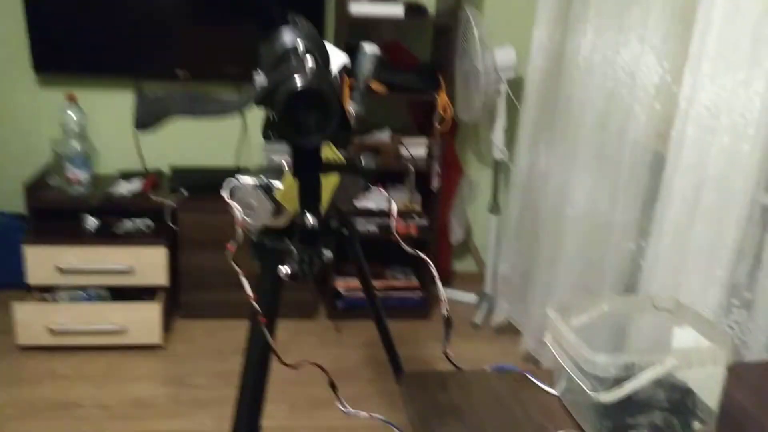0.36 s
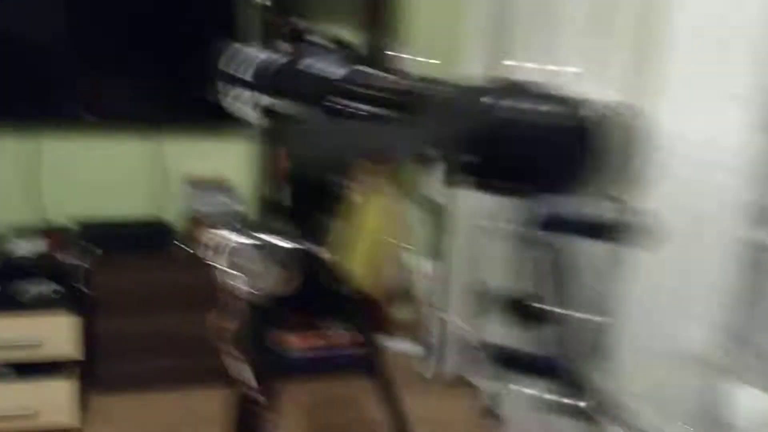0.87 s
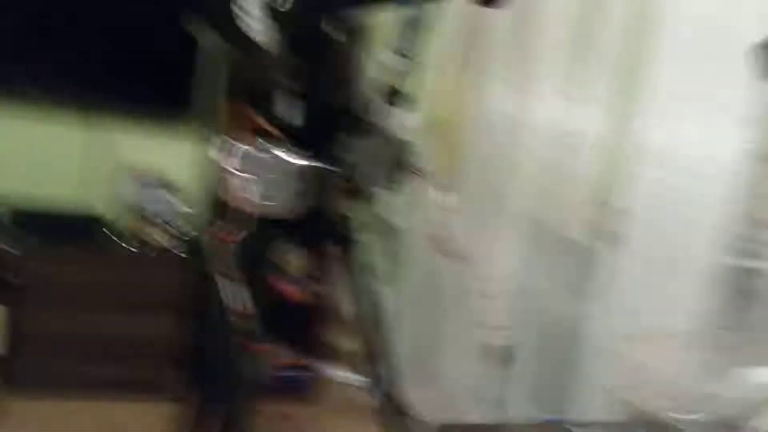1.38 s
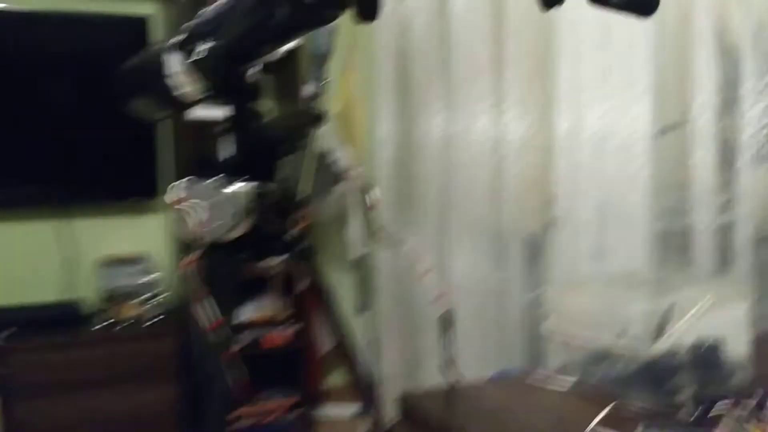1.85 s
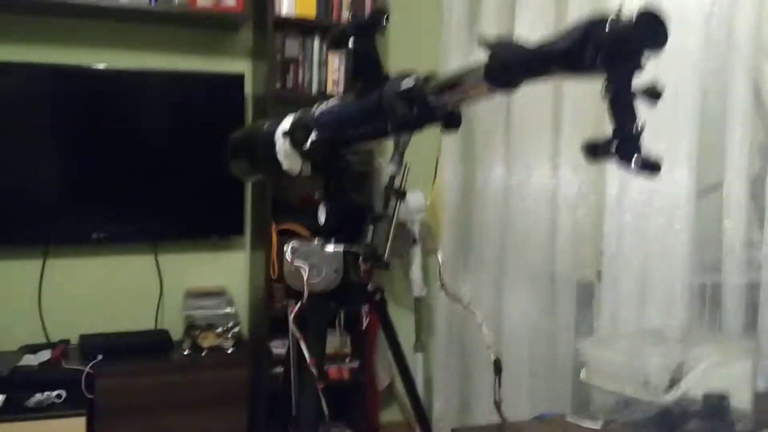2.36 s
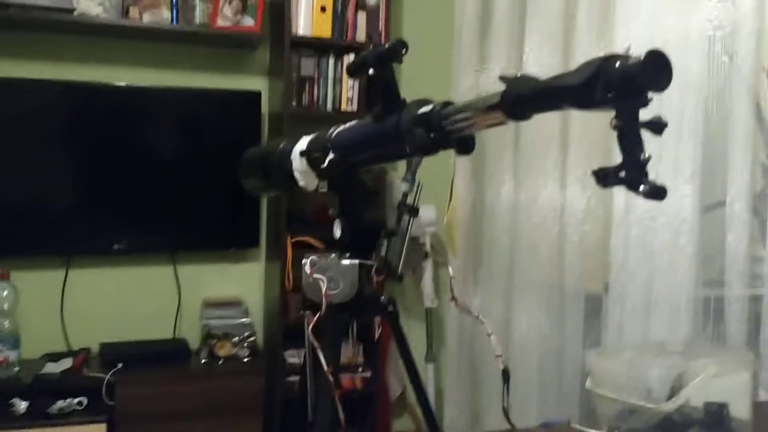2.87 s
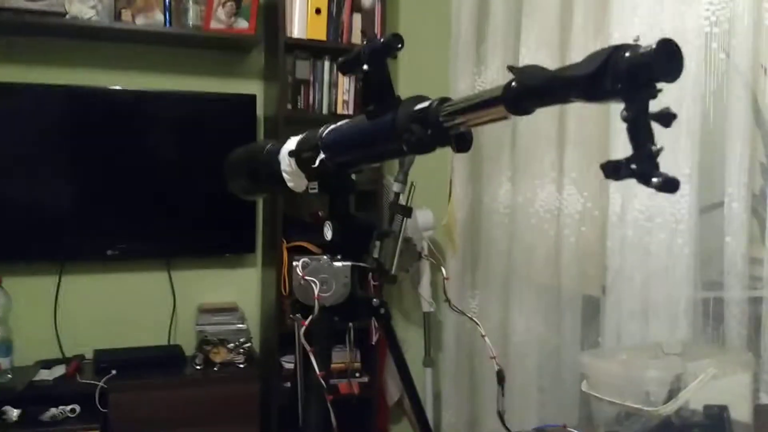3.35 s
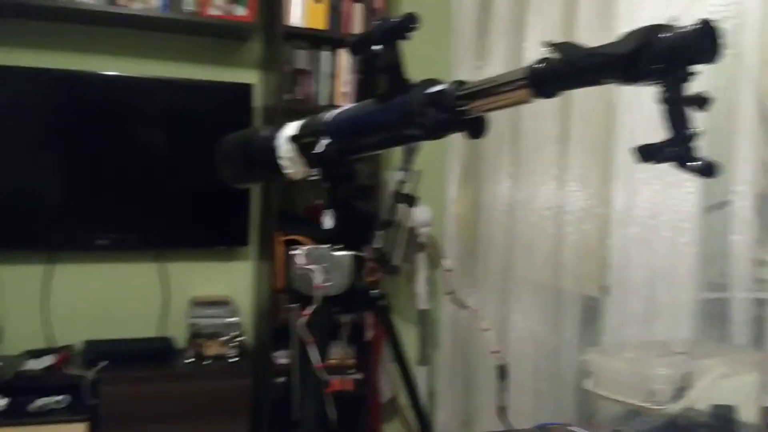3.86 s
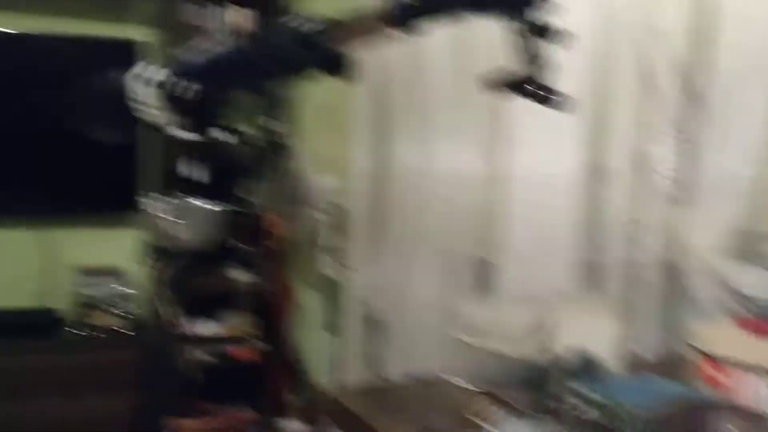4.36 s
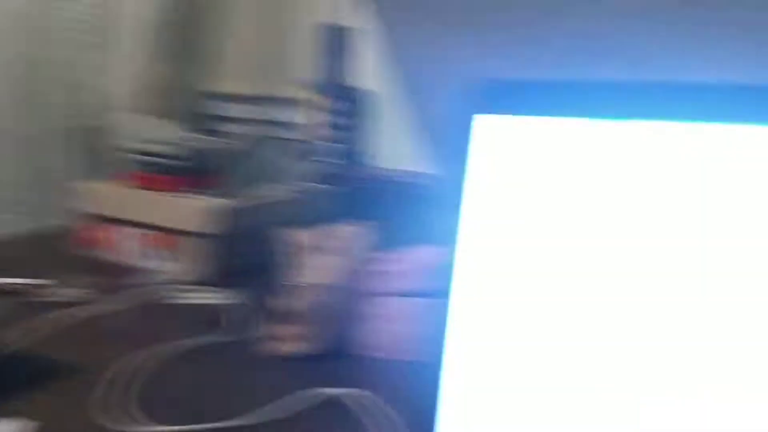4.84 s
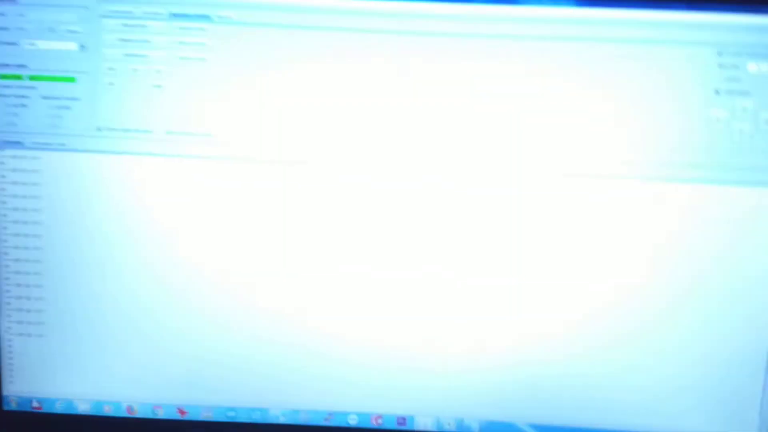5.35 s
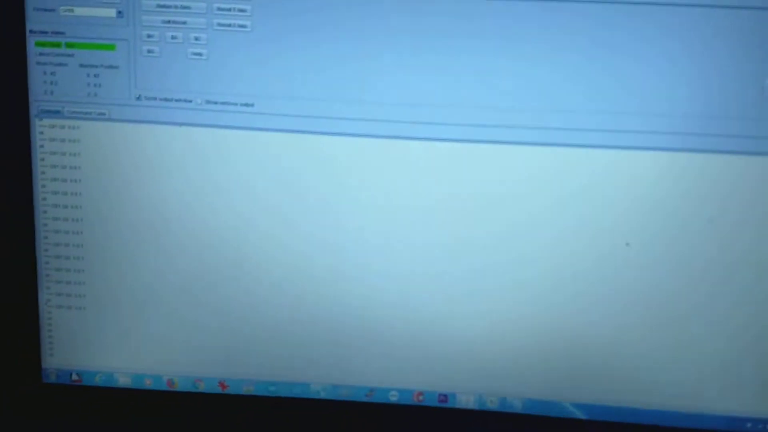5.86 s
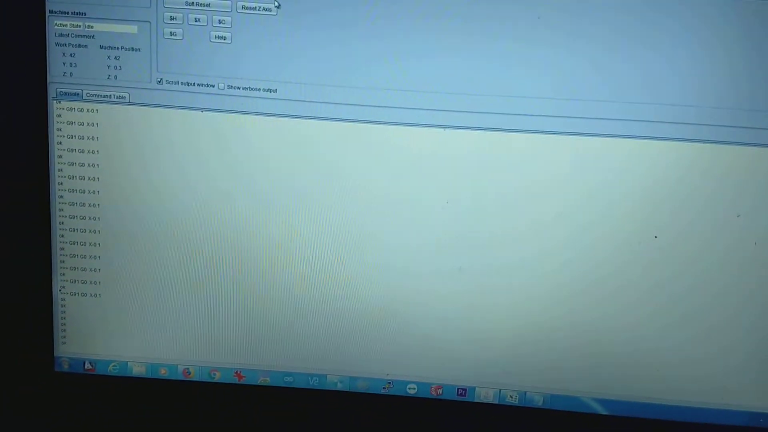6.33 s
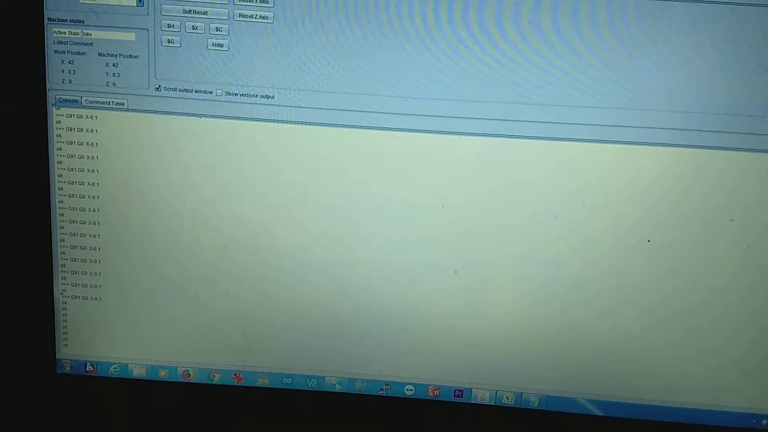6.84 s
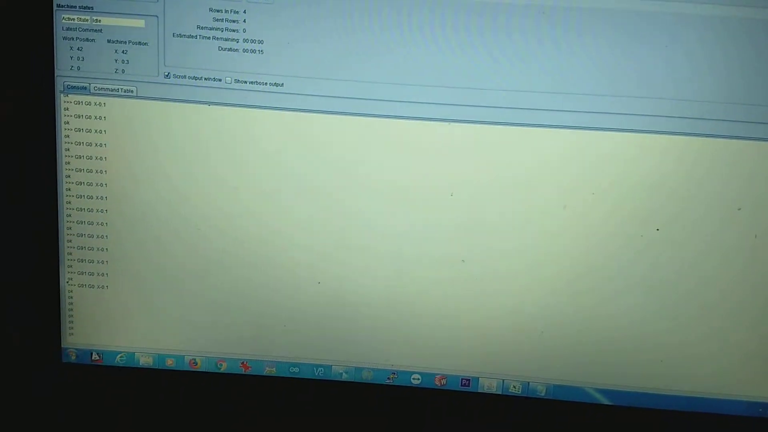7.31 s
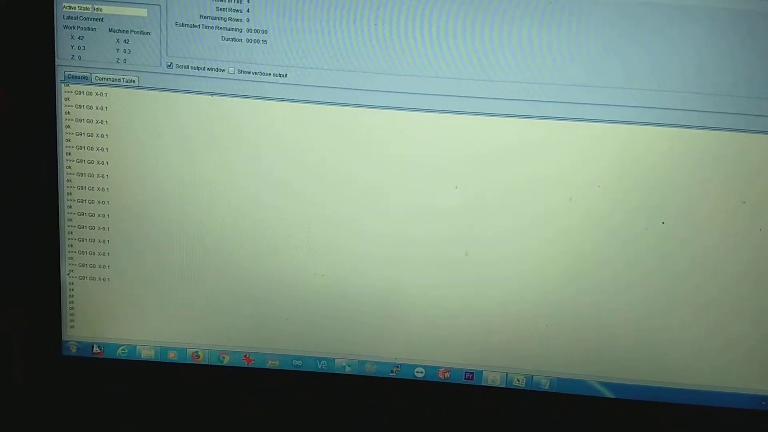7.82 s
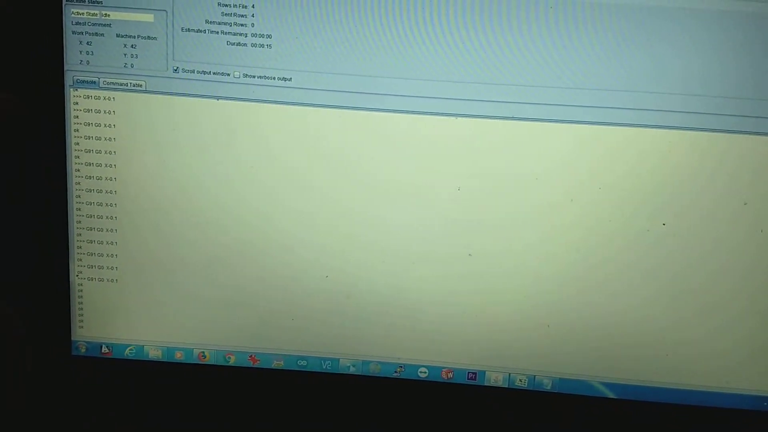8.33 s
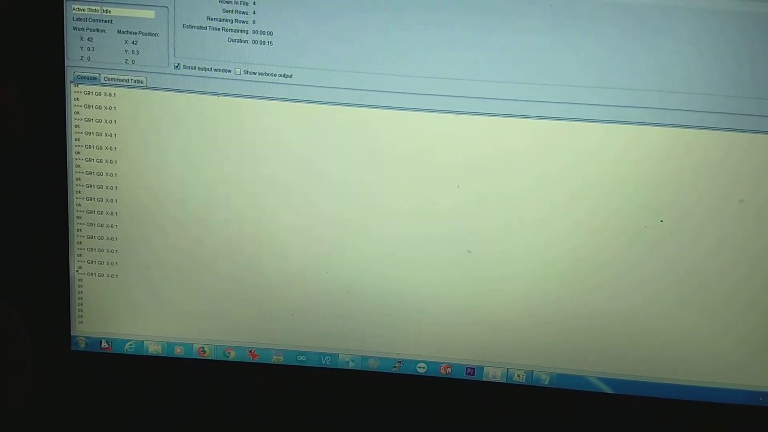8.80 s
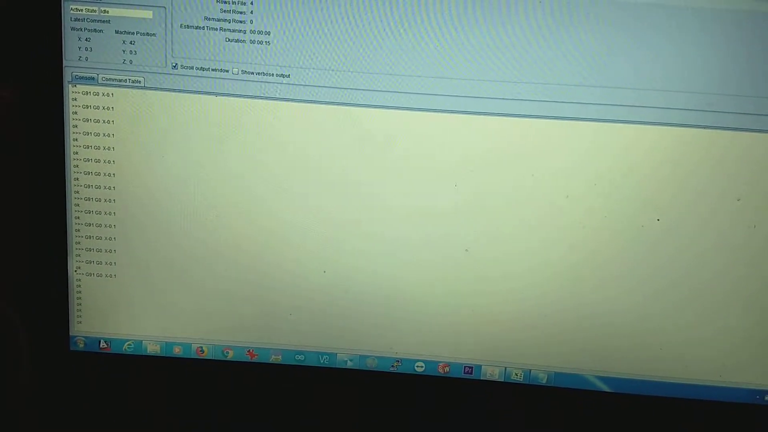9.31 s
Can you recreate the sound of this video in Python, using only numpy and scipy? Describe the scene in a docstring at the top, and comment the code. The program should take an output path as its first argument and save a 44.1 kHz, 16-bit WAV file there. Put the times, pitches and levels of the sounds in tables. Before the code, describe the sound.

In a small room a thin motor whine runs down after fumbling and creaks; loud desk thumps follow, then quiet with a few crisp clicks.

```python
"""In a small furnished room keys are tapped and a desk is knocked; a little motor whines, then runs down.
Struck bodies are excited modes with echoes, the motor a harmonic series shaped by its housing; cloth,
stirred air, fan, case rumble and a steady background are filtered noise, furniture squeaks gliding sines.
A hand-held phone listens with two microphones; fingers rub and creak on its case near the second.
It makes stereo by taking a delayed copy of each microphone away from the other."""
import sys
import numpy as np
from scipy import signal
from scipy.fft import rfft, irfft
from scipy.io import wavfile

SR = 44100
rng = np.random.default_rng(int(sys.argv[2]) if len(sys.argv) > 2 else 0)


def store_pcm(level_fs):
    """Save levels as 16-bit WAV."""
    pcm = np.round(np.clip(level_fs, -1, 1) * 32767).astype(np.int16)
    wavfile.write(sys.argv[1], SR, np.atleast_2d(pcm).T)


def voltage_ratio(level):
    """Linear amplitude factor for a level in decibels (scalar or array-like)."""
    return 10 ** (np.asarray(level, float) / 20)


N = 427329
TIME = np.arange(N) / SR
HZ = np.maximum(np.fft.rfftfreq(N, 1 / SR), 1)

# In spectra of noise, level/dB is a relative density; the noise is then scaled to rms 1.
# reverberation of the room: [f/Hz, decay time t60/s]
ROOM_DECAY = [(200, 0.47), (1000, 0.32), (4000, 0.35), (10000, 0.28)]
# steady background, low rumble and microphone hiss: [f/Hz, level/dB]
BACKGROUND_SPECTRUM = [(30, -18), (60, 20), (120, 15.5), (300, -2), (1000, -1), (6000, -2.5), (9000, -6),
                       (16000, 0)]
# amplitude response of the first microphone: [f/Hz, level/dB]
FIRST_MIC_RESPONSE = [(100, -3), (7200, -1.64), (7900, 4), (16000, -8)]
# amplitude response of the delayed copy that is subtracted: [f/Hz, level/dB]
COPY_RESPONSE = [(40, 0.5), (300, -2.85), (2000, -3.5), (4700, -4), (7000, -6.5), (9000, -8),
                 (16000, -13.5)]

# cloth rustle, a gauge of how much the person moves: [t/s, level/dB]
RUSTLE = [(0, -66.5), (.55, -71.5), (.85, -63.5), (1.43, -51.5), (1.54, -55), (1.59, -66), (1.74, -62),
          (1.83, -54.5), (2.43, -54), (3.07, -55), (3.56, -56.5), (3.94, -63), (4.2, -60), (4.78, -62.5),
          (4.99, -51), (5.12, -55), (5.5, -50), (5.62, -59), (6.11, -57), (6.15, -64), (6.4, -64.5),
          (6.85, -72.5), (7.3, -64.5), (8.04, -69.5), (8.75, -71.5), (9.3, -76.5), (9.69, -60)]
# noise of rustling cloth: [f/Hz, level/dB]
CLOTH_SPECTRUM = [(1500, -11), (2300, 4.5), (3500, 7), (5500, 3.5), (7300, -0.5), (7800, -5), (11000, -9.5),
                  (16000, -25)]
# noise of the stirred air: [f/Hz, level/dB]
STIR_SPECTRUM = [(150, 4), (300, -0.5), (700, -3.5), (950, -3.5), (1500, -4), (2200, -8.5), (3000, -11),
                 (8000, -68)]
# weight landing on floor or furniture: [start t/s, loudest t/s, end t/s, boom level/dB, stir level/dB]
SHOVES = [(1.774, 1.834, 1.94, -49, -48.5), (1.89, 1.947, 2.6, -46, -50.5), (2.163, 2.164, 2.3, -57, -51.5),
          (4.89, 5.02, 5.08, -42.5, -39), (4.95, 5.11, 5.25, -38, -54.5), (5.277, 5.327, 5.42, -71, -43),
          (5.433, 5.47, 5.54, -60, -37.5), (5.543, 5.616, 5.86, -63, -55.5)]
# boom of the floor: [f/Hz, level/dB]
BOOM_SPECTRUM = [(25, -28), (55, 18.5), (125, 7), (240, -5.5), (500, -26), (3000, -70)]
# a sleeve brushing past; silent if it ends before its start: [start t/s, loudest t/s, end t/s, level/dB]
BRUSHES = [(.72, .88, 0.94, -58.5), (5.76, 5.92, 6.14, -55.5), (6.184, 6.216, 6, -61),
           (7.955, 8.03, 7.95, -56), (8.123, 8.197, 8.24, -59), (8.386, 8.436, 8.4, -69)]
# noise of the brushed fabric: [f/Hz, level/dB]
SLEEVE_SPECTRUM = [(1500, -7), (2600, -1), (3400, 5.5), (4200, -9), (6000, -34), (9000, -25)]
# the hand shifting its hold: [t/s, level/dB]
JOLTS = [(.9, -55), (1.0, -49.5), (1.1, -66), (1.2, -53), (1.32, -49), (1.42, -46.5), (1.52, -45),
         (1.58, -46), (2.1, -64), (2.19, -44.5), (2.45, -51.5), (2.74, -47.5), (2.9, -53), (3.15, -49),
         (3.3, -50), (3.41, -54), (3.5, -52), (3.56, -50), (3.89, -58), (4.27, -56), (4.8, -61)]
# rumble through the case: [f/Hz, level/dB]
RUMBLE_SPECTRUM = [(25, -22), (55, 5), (120, -2.5), (220, -4), (500, -38), (3000, -80)]

# faint steady whistles of the fan: [f/Hz, width of each of two resonators/Hz, rms level/dB]
FAN_WHISTLES = [(914, 83, -74.5), (1063, 39, -76.5), (3570, 20, -90)]
# furniture squeaks and groans: [start t/s, end t/s, first f/Hz, last f/Hz, level/dB]
SQUEAKS = [(1.765, 1.87, 499, 478, -48.5), (1.807, 1.97, 121, 121, -39), (1.864, 1.957, 620, 579, -49),
           (1.88, 1.96, 238, 235, -45.5), (1.978, 2.025, 232, 232, -44.5), (2.914, 3.057, 3325, 3590, -51),
           (5.08, 5.14, 1960, 1794, -50), (5.193, 5.224, 3500, 3680, -48), (5.377, 5.44, 245.5, 240, -42),
           (5.56, 5.627, 260, 260, -47), (5.626, 5.696, 261, 254, -58)]
# resonances of the motor housing: [f/Hz, width of each of two resonators/Hz, level/dB]
HOUSING_MODES = [(3600, 500, 1), (5300, 450, -3), (1150, 600, -4), (2200, 600, -8), (5760, 200, -4)]

# a finger sliding on the case, before its reach to each microphone:
# [start t/s, loudest t/s, end t/s, level/dB]
SLIDES = [(.986, .99, 1.035, -42), (1.035, 1.07, 1.12, -47), (1.165, 1.2, 1.27, -46),
          (1.23, 1.305, 1.321, -40), (1.35, 1.38, 1.405, -49), (1.45, 1.495, 1.56, -55),
          (2.16, 2.2, 2.27, -57), (2.305, 2.328, 2.35, -51), (2.355, 2.42, 2.47, -57),
          (2.675, 2.71, 2.728, -46), (3.11, 3.135, 3.16, -52), (3.58, 3.62, 3.64, -62)]
# noise of skin on the case: [f/Hz, level/dB]
SKIN_SPECTRUM = [(1200, 1.5), (3500, 9.5), (6000, 7), (7300, 2), (8300, 13), (11000, 14.5), (15500, 2.5)]
# creaks of the case in the grip, before the offset of each mode:
# [t/s, snap level/dB, treble relative to snap/dB, thump level/dB]
CREAKS = [(0.9883, -35.5, 4.5, -66), (1.244, -44, 6.5, -60.5), (1.287, -32, -4, -58),
          (1.3538, -34, -13, -71), (1.4698, -30, -13.5, -65), (1.4906, -26, -16, -55.5),
          (1.5647, -30, -15, -66), (1.5645, -20, -3, -64), (1.6028, -3, -87, -68), (1.609, -39, -7, -69),
          (2.175, -38, -10, -52), (2.2065, -26, -15, -65), (2.325, -27, -17, -61), (2.3314, -39, -6, -61),
          (2.3638, -29, -17, -62), (2.4248, -17, -11, -68), (2.4516, -32, -2.5, -53),
          (2.599, -30.5, -18, -62), (2.72, -16, -23, -49.5), (2.8922, -22, -23, -58.5),
          (3.1336, -22, -20.5, -58.5), (3.4522, -42, -30, -61.5), (3.4622, -29, -33, -62),
          (3.4997, -22, -35, -60.5), (3.598, -30, -21, -66), (3.614, -28.5, -15, -67),
          (3.6272, -29, -5.5, -63), (3.6342, -29.5, -4.5, -62.5)]

# key clicks, and one dull knock at 1.87 s:
# [t/s, cap peak level/dB, base thud level/dB before an offset, contact hardness as corner f/Hz]
CLICKS_AND_KNOCK = [(1.8674, -36, -37.5, 615), (4.1985, -61, -53.5, 700), (4.398, -50, -59, 700),
                    (4.7219, -39, -53.5, 700), (6.93, -30.5, -52.5, 15000), (7.0189, -27, -59, 14760),
                    (9.302, -30, -50, 15000), (9.397, -26.5, -61, 15000), (9.5388, -43, -51, 2980),
                    (9.645, -31.5, -75, 4400)]
# modes of the keycap: [f/Hz, level/dB, t60/s]
KEYCAP_MODES = [(2800, -11, .003), (3500, -5, .003), (4200, -6, .003), (5400, -2, .002), (6400, 1, .002),
                (7300, 3, .002), (8800, 1, .002), (11500, -2, .0015), (14000, -2, .0015)]
# modes of the base under the keys: [f/Hz, level/dB, t60/s]
KEY_BASE_MODES = [(450, -3, 0.0029), (700, 0, 0.0066), (1043, 3.5, 0.027), (1530, 8.5, 0.0078)]
# knocks and scuffs on the desk, before fixed offsets:
# [t/s, level/dB, scuff relative to knock/dB, rattle t60/s, level sent to the room/dB]
DESK_TAPS = [(1.488, -39.5, -8.5, 0.17, -5), (1.773, -37, -14.5, 0.029, 1), (1.835, -38.5, -15, 0.053, 1),
             (1.993, -37, -20.5, 0.082, 0), (2.161, -41.5, -3.5, 0.12, 3.5), (2.615, -40, 0, 0.28, -11),
             (3.037, -40.5, 0.5, 0.14, -1.5), (3.873, -41.5, 0, 0.24, -6), (4.828, -21, -44, 0.16, -7),
             (4.919, -18.5, -22, 0.058, 3), (5.099, -41, -29, 0.14, -1), (5.199, -34.5, -19.5, 0.12, -0.5),
             (5.306, -19.5, -25, 0.2, -16), (5.441, -18, -25, 0.11, -8), (5.648, -51.5, -7.5, 0.15, -22),
             (5.874, -54, -3, 0.14, -14), (6.202, -53.5, 0, 0.1, 2), (7.975, -53.5, -5, 0.088, 1),
             (8.003, -68, 0.5, 0.18, 10)]
# modes of the desk: [f/Hz, level/dB, t60/s]
DESK_MODES = [(255, -83, 0.006), (357, 3, 0.082), (415, -18, 0.016), (494, 2, 0.038), (550, -4.5, 0.037),
              (703, 10.5, 0.035), (829, 5.5, 0.05), (1050, 7, 0.015), (1236, 15.5, 0.0078),
              (1414, 8, 0.011), (1850, 7, 0.052)]
# noise of the scuffed desk top: [f/Hz, level/dB]
SCUFF_SPECTRUM = [(600, -16), (1500, -3), (3500, 0), (7300, -2), (7700, -15), (11000, -24), (16000, -33)]

BACKGROUND_DB = -63
COPY_LAG_S = 18.85 / SR
TOP_LIMIT_HZ = 15780
RUSTLE_REF_DB = -60.5   # the stir and grip levels below hold at this rustle level
STIR_DB, STIR_FOLLOWS = -58.5, 0.53   # FOLLOWS: share of the rustle's swing, in dB per dB
GRIP_DB, GRIP_FOLLOWS = -69, 0.47
JOLT_BEFORE_S, JOLT_AFTER_S = 0.054, 0.086   # the rumble of a jolt swells and dies
SQUEAK_RISE_SHARE, SQUEAK_ROOM_DB = 0.51, -3
WHINE_HZ, SWITCH_OFF_S, SAG_HZ_PER_S, SLOWEST_HZ = 1438, 3.9, 790, 200
RUN_DB, COAST_DB, COAST_FADE_DB_PER_S = -65.5, -51.5, 7   # before the gains of the housing
OVERTONE_LOSS_DB = 0.7   # per harmonic number


def rms_one(x):
    """Normalisation: scale to rms 1."""
    return x / np.sqrt(np.mean(x ** 2) + 1e-20)


def in_time(rows):
    """Linear interpolation: the columns of a curve, sample by sample."""
    t, *columns = np.transpose(rows)
    return [np.interp(TIME, t, column) for column in columns]


def at_hz(points, hz):
    """Interpolation of a spectrum on a logarithmic frequency axis."""
    f, value = np.array(points)[:, 0], np.array(points)[:, 1]
    return np.interp(np.log(hz), np.log(f), value)


def drift(rate):
    """Slow random fluctuation: normal values of spread 1, 2 * rate per second, joined by straight lines."""
    knots = rng.standard_normal(N // 64)
    return np.interp(TIME * rate * 2, np.arange(len(knots)), knots)


def pair(size, alike_hz):
    """Spatial coherence: spectra of white noise whose long waves reach both microphones alike."""
    shared, *own = rfft(rng.standard_normal((3, size)))
    alike = 1 / (1 + (np.fft.rfftfreq(size, 1 / SR) / alike_hz) ** 2)
    return np.sqrt(alike) * shared + np.sqrt(1 - alike) * np.array(own)


def noise(spectrum, flicker_db, rate, alike_hz=20):
    """Filtered noise: coloured at both microphones, its level flickering in both together."""
    coloured = irfft(pair(N, alike_hz) * voltage_ratio(at_hz(spectrum, HZ)), N)
    return rms_one(coloured) * voltage_ratio(flicker_db * drift(rate))


def swells(start_s, loudest_s, end_s, db):
    """Addition of powers: overlapping swells, each a quarter sine up and a quarter sine down."""
    power = np.zeros(N)
    for start, top, end, peak_db in zip(start_s, loudest_s, end_s, db):
        span = slice(round(start * SR), round(end * SR))
        corners = [start, np.clip(top, start, end), end]
        angle = np.interp(TIME[span], corners, [0, np.pi / 2, np.pi])
        power[span] += (voltage_ratio(peak_db) * np.sin(angle)) ** 2
    return np.sqrt(power)


def ring(x, hz, t60):
    """Damped oscillator: a unit click sets a sine of initial height 1 ringing."""
    r, w = voltage_ratio(-60 / (t60 * SR)), 2 * np.pi * hz / SR
    return signal.lfilter([0, np.sin(w)], [1, -2 * r * np.cos(w), r * r], x + 1e-18)


def strike(contacts, modes, spread_db):
    """Modal excitation: each blow favours other modes, as the spot struck does; peak 1."""
    sound = 0
    for hz, db, t60 in modes:
        sound = sound + voltage_ratio(db + rng.normal(0, spread_db)) * ring(contacts, hz, t60)
    return sound / np.max(abs(sound))


def peak(x, hz, width_hz):
    """Resonance: a two-pole band-pass with a gain of about 1 at its centre."""
    r = np.exp(-np.pi * width_hz / SR)
    poles = [1, -2 * r * np.cos(2 * np.pi * hz / SR), r * r]
    return signal.lfilter([(1 - r * r) / 2, 0, (r * r - 1) / 2], poles, x)


def room(x, first_echo_s):
    """Reverberation: noise dying band by band, drawn for each microphone; mean energy 1."""
    t = np.arange(SR // 2) / SR
    edges = 150 * 2.0 ** np.arange(8)   # octave bands
    tail = 0
    for low, high in zip(edges, edges[1:]):
        octave = signal.butter(2, [low, high], "band", fs=SR, output="sos")
        band = signal.sosfilt(octave, irfft(pair(len(t), alike_hz=800), len(t)))
        tail = tail + band * voltage_ratio(-60 * t / at_hz(ROOM_DECAY, np.sqrt(low * high)))
    tail = tail * (t > first_echo_s)
    tail = tail / np.sqrt(np.sum(tail ** 2) / 2)
    return signal.fftconvolve(x[None], tail, axes=1)[:, :N]


def background():
    """Stationary noise: a steady background of low rumble and microphone hiss."""
    return voltage_ratio(BACKGROUND_DB) * noise(BACKGROUND_SPECTRUM, 0.077, 5.9)


def fan():
    """Narrow-band resonance: air through a fan sings as noise passed twice through sharp peaks."""
    sound = 0
    for hz, width_hz, db in FAN_WHISTLES:
        air = rng.standard_normal((2, N))
        sound = sound + voltage_ratio(db) * rms_one(peak(peak(air, hz, width_hz), hz, width_hz))
    return sound


def moving():
    """Friction and impact: cloth rustles, air stirs as the person moves; shoves boom and add stir."""
    cloth_db, = in_time(RUSTLE)
    start, top, end, boom_db, stir_db = np.transpose(SHOVES)
    follow = voltage_ratio(STIR_DB + STIR_FOLLOWS * (cloth_db - RUSTLE_REF_DB))
    stir_gain = np.hypot(follow, swells(start, top, end, stir_db))
    stir = stir_gain * noise(STIR_SPECTRUM, 1.0, 12, alike_hz=400)
    rustle = voltage_ratio(cloth_db) * noise(CLOTH_SPECTRUM, 1.0, 50)
    boom = swells(start, top, end, boom_db) * noise(BOOM_SPECTRUM, 5.2, 9.2, alike_hz=900)
    return stir + rustle + boom


def sleeve():
    """Friction: fabric hisses in a narrow band while it brushes."""
    return swells(*np.transpose(BRUSHES)) * noise(SLEEVE_SPECTRUM, 1.3, 67)


def grip():
    """Structure-borne sound: case rumble follows the movement and swells at each shift of the hand."""
    s, db = np.transpose(JOLTS)
    held = voltage_ratio(GRIP_DB + GRIP_FOLLOWS * (in_time(RUSTLE)[0] - RUSTLE_REF_DB))
    jolts = swells(s - JOLT_BEFORE_S, s, s + JOLT_AFTER_S, db)
    return np.hypot(held, jolts) * noise(RUMBLE_SPECTRUM, 3.8, 10, alike_hz=60.4)


def squeaks():
    """Frequency glide: furniture squeaks as wobbling, throbbing sines; the room answers."""
    wobble, throb = 1 + 0.036 * drift(200), voltage_ratio(1.7 * drift(100))
    tones = 0
    for start, end, first_hz, last_hz, db in SQUEAKS:
        hz = np.interp(TIME, [start, end], [first_hz, last_hz]) * wobble
        tone = np.sin(2 * np.pi * np.cumsum(hz) / SR)
        loudest = start + SQUEAK_RISE_SHARE * (end - start)
        tones = tones + tone * swells([start], [loudest], [end], [db])
    tones = tones * throb
    return tones + voltage_ratio(SQUEAK_ROOM_DB) * room(tones, 0.0098)


def motor():
    """Source and filter: a pulse per slot passing; the housing lifts overtones that cross its resonances."""
    coasting_s = np.maximum(TIME - SWITCH_OFF_S, 0)
    hz = np.maximum(WHINE_HZ - SAG_HZ_PER_S * coasting_s, SLOWEST_HZ)
    phase = 2 * np.pi * np.cumsum(hz * (1 + 0.00352 * drift(40))) / SR
    lines = sum(np.sin(k * phase) * voltage_ratio(3 * drift(15) - OVERTONE_LOSS_DB * k) for k in range(1, 8))
    housed = sum(voltage_ratio(db) * peak(peak(lines, f, width), f, width) for f, width, db in HOUSING_MODES)
    # quiet while driven, it sings out once it coasts
    level_db = np.where(coasting_s > 0, COAST_DB - COAST_FADE_DB_PER_S * coasting_s, RUN_DB)
    whine = voltage_ratio(level_db) * housed
    return whine * [[1], [0.3]] + voltage_ratio(-3.5) * room(whine, 0.0029)


def rub():
    """Stick-slip friction: skin on the case gives bright grainy noise while the finger slides."""
    finger = swells(*np.transpose(SLIDES)) * noise(SKIN_SPECTRUM, 0.72, 160)[0]
    return finger * voltage_ratio([[-20], [4]])   # close to the second microphone


def creaks():
    """Impulse response: the shell snaps near the second microphone; a thump shakes the two oppositely."""
    s, db, treble_db, thump_db = np.transpose(CREAKS)
    at = np.round(s * SR).astype(int)
    # level/dB, f/Hz, t60/s, gain at each microphone
    modes = [(db - 0.5, 5900, 0.0013, [0.1, 1]),
             (db - 13.5, 3300, 0.0015, [0.1, 1]),
             (db + treble_db + 19.0, 9300, 0.0011, [0.1, 1]),
             (thump_db + 25.5, 800, 0.007, [0.3, 1]),
             (thump_db + 23, 80, 0.08, [-0.7, 1])]
    out = 0
    for level_db, hz, t60, reach in modes:
        clicks = np.zeros(N)
        clicks[at] = -voltage_ratio(level_db)
        out = out + ring(clicks, hz, t60) * np.array(reach)[:, None]
    return out


def clicks_and_knock():
    """Modal excitation: brief contacts ring cap and base in key clicks and one dull knock; walls answer."""
    t, out = np.arange(SR // 10) / SR, np.zeros(N)
    for s, db, thud_db, hardness_hz in CLICKS_AND_KNOCK:
        padded = signal.butter(2, hardness_hz, fs=SR, output="sos")
        contacts = signal.sosfilt(padded, rng.standard_normal(len(t)) * voltage_ratio(-60 * t / 0.034))
        cap = voltage_ratio(db) * strike(contacts, KEYCAP_MODES, 0.99)
        base = voltage_ratio(thud_db + 13.5) * strike(contacts, KEY_BASE_MODES, 0.97)
        at = round(s * SR)
        out[at:at + len(t)] += (cap + base)[:N - at]
    later = np.roll(out, 9)   # samples: the keys are nearer the first microphone
    return [out, 0.24 * later] + voltage_ratio(-11.5) * room(out, 0.011)


def taps():
    """Modal excitation: a dying rattle of tiny contacts rings the desk and scuffs its top; the room answers."""
    t, near, far = np.arange(SR // 2) / SR, np.zeros((2, N)), np.zeros(N)
    bins_hz = np.arange(len(t) // 2 + 1) * 2 + 1
    colour = voltage_ratio(at_hz(SCUFF_SPECTRUM, bins_hz))
    soft = signal.butter(2, 1000, fs=SR, output="sos")   # a padded blow
    for s, db, bright_db, t60, room_db in DESK_TAPS:
        dying = voltage_ratio(-60 * t / t60) * (1 - np.exp(-t / 0.0027))
        contacts = rng.standard_normal(len(t)) * voltage_ratio(0.51 * rng.standard_normal(len(t)))
        blow = signal.sosfilt(soft, contacts * dying)
        scuff = rms_one(irfft(pair(len(t), alike_hz=900) * colour, len(t))) * dying
        knock = strike(blow, DESK_MODES, 0.3)
        sound = voltage_ratio(db - 2.5) * (knock + voltage_ratio(bright_db + 12.5) * scuff)
        at = round(s * SR)
        near[:, at:at + len(t)] += sound[:, :N - at]
        far[at:at + len(t)] += voltage_ratio(room_db) * sound[0, :N - at]
    near[1] = np.roll(near[1], 5)   # samples: the desk is nearer the first microphone
    return near + room(far, 0.0051)


def scene():
    """Superposition: the sum of fan, person, furniture, motor, fingers, keys and desk at two microphones."""
    soft_sounds = fan() + moving() + sleeve() + grip()
    return soft_sounds + squeaks() + motor() + rub() + creaks() + clicks_and_knock() + taps()


def band_limit(x):
    """A steep low-pass at the top of the band."""
    return signal.sosfilt(signal.butter(12, 17040, fs=SR, output="sos"), x)


def record(dry):
    """Pressure difference: after background and colour, each side loses a late copy of the other."""
    first, second = rfft(dry + background())
    first = first * voltage_ratio(at_hz(FIRST_MIC_RESPONSE, HZ))
    copy = voltage_ratio(at_hz(COPY_RESPONSE, HZ)) * np.exp(-2j * np.pi * HZ * COPY_LAG_S)
    top_cut = 1 / np.sqrt(1 + (HZ / TOP_LIMIT_HZ) ** 200)   # a very steep low-pass
    mix = irfft(top_cut * [first - copy * second, second - copy * first], N)
    return band_limit(mix)


dry = scene()
out = record(dry)
store_pcm(out)
```